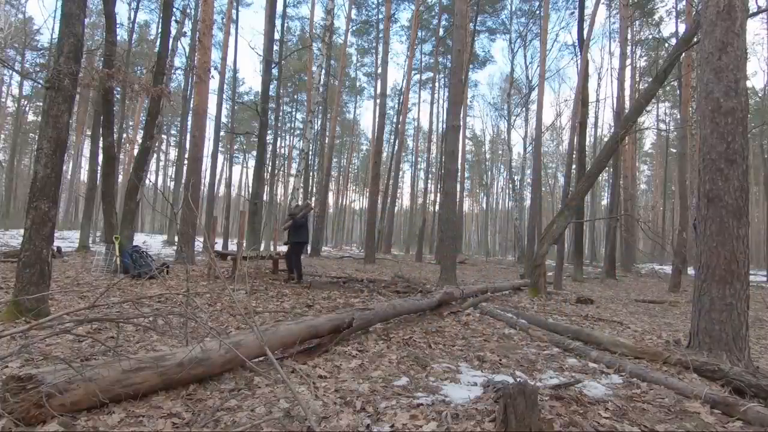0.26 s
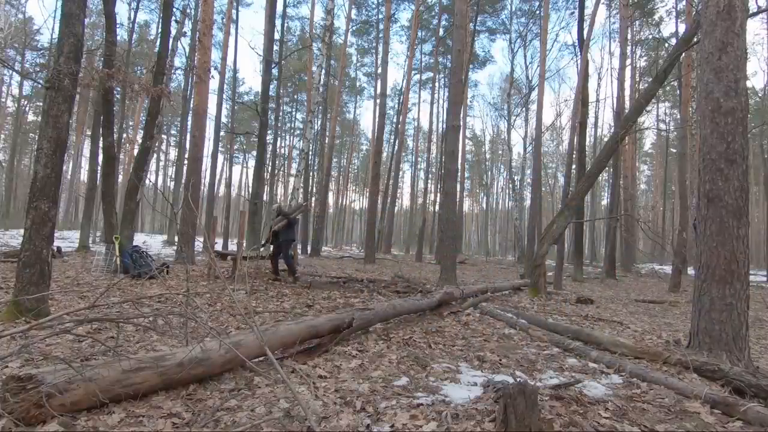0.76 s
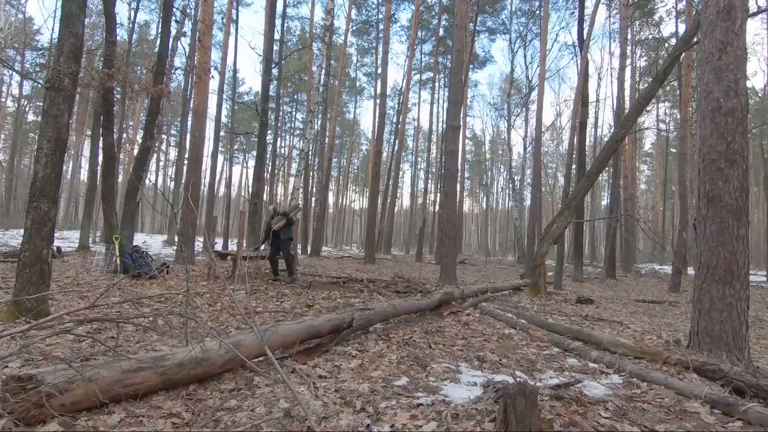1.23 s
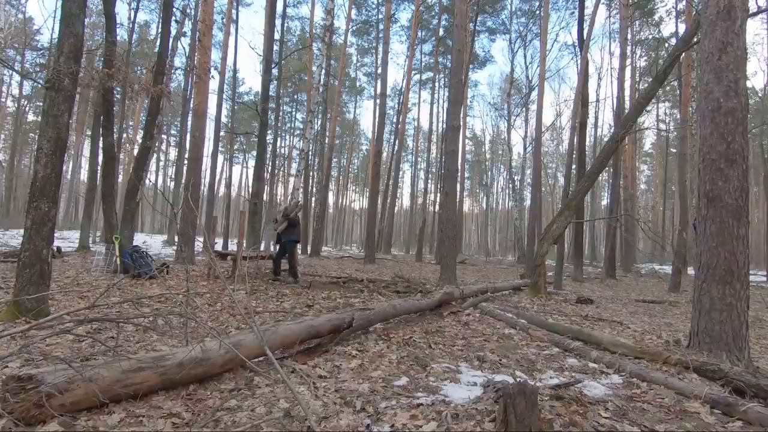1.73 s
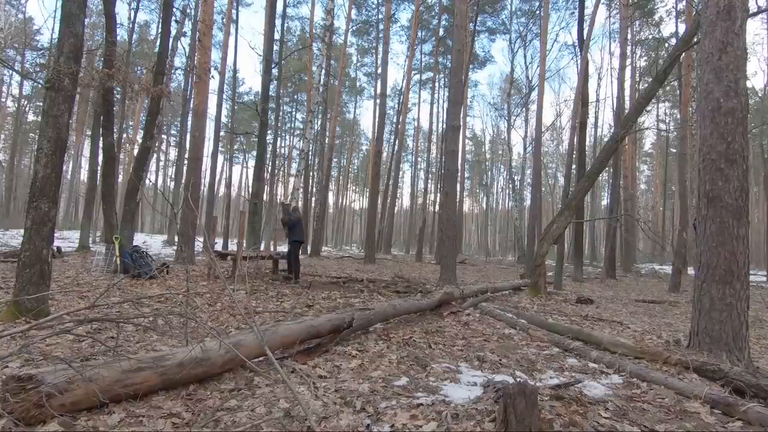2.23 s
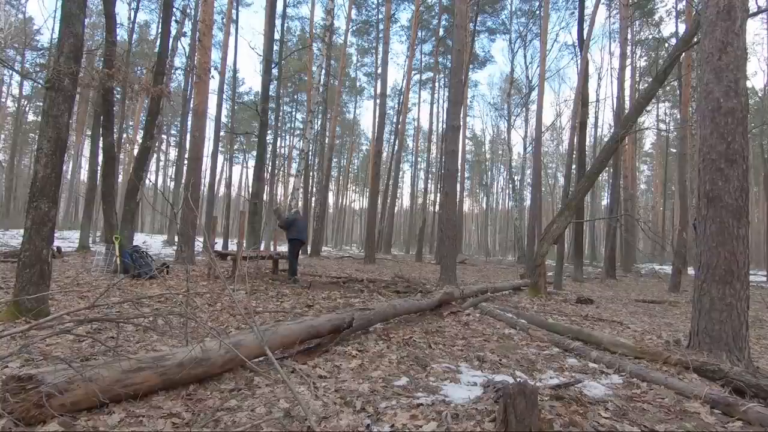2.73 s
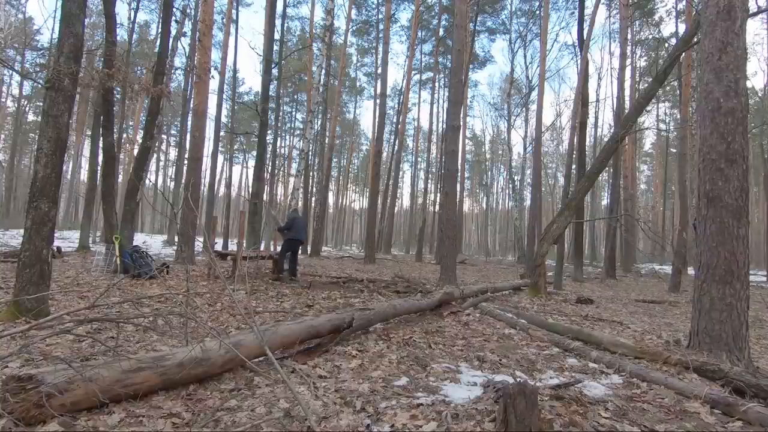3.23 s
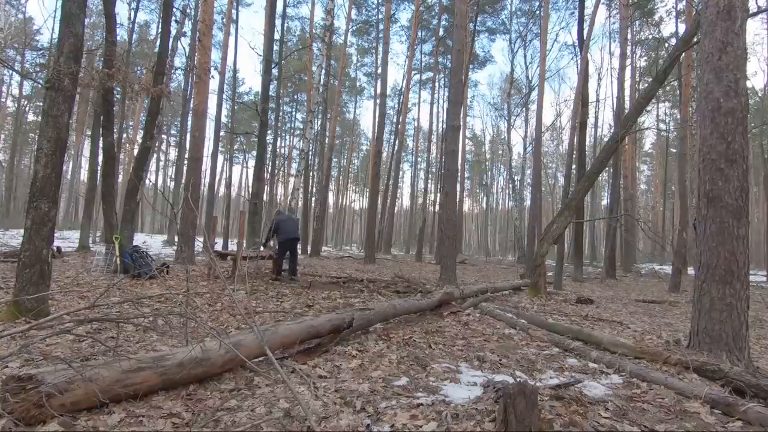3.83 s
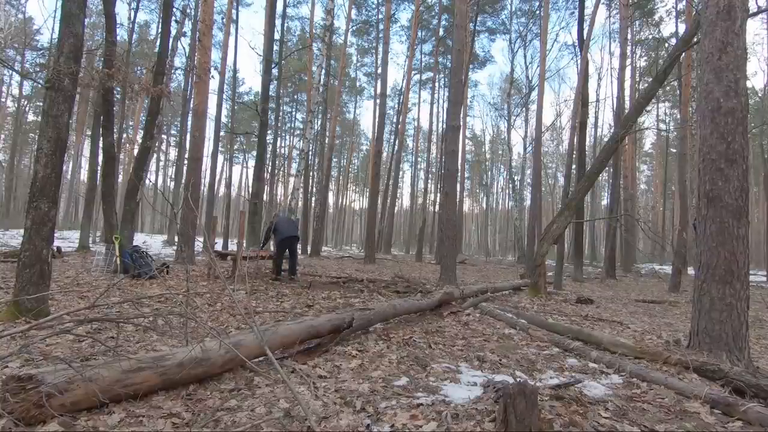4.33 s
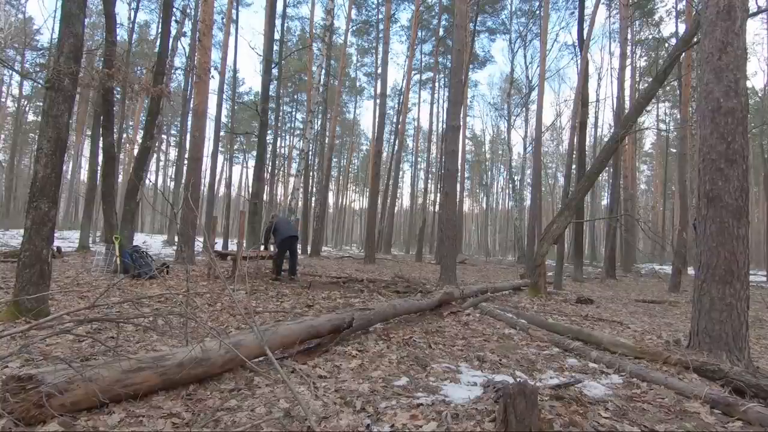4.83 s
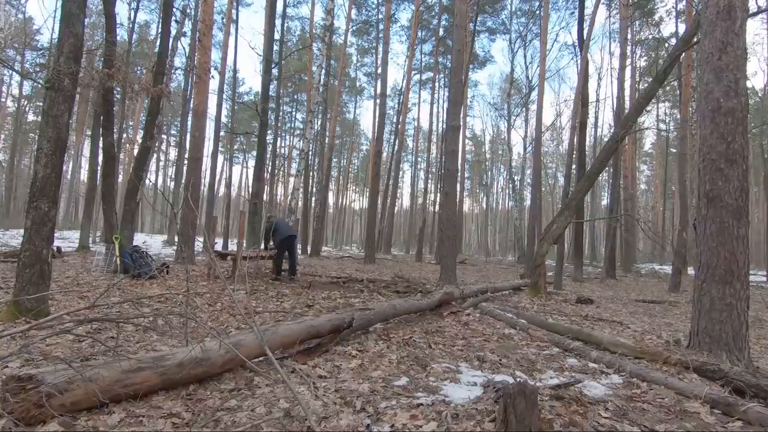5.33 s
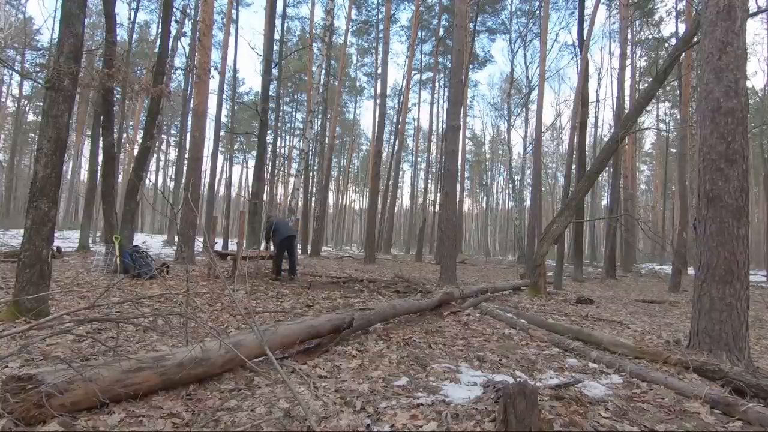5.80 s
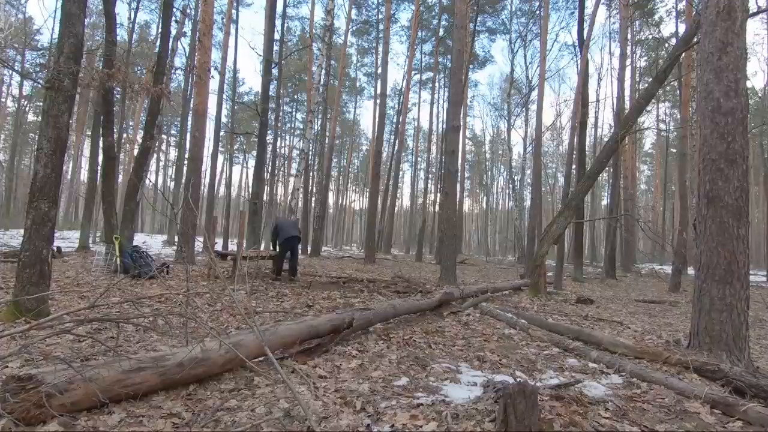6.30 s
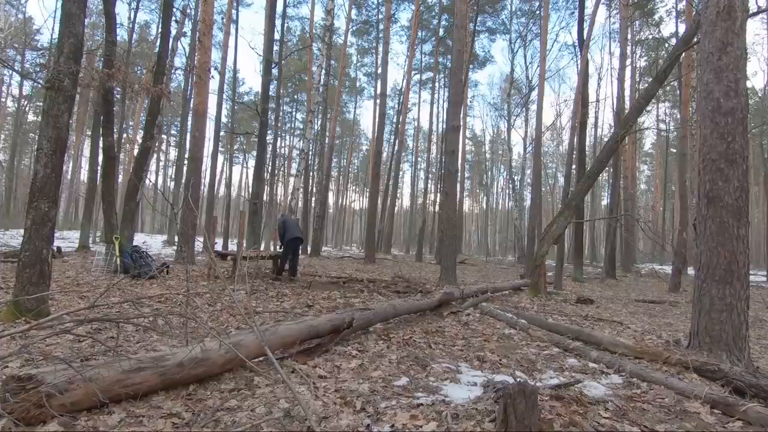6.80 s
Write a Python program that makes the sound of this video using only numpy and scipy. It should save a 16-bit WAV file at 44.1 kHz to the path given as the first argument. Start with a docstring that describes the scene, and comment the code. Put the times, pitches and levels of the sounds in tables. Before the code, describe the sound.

In a bare forest, faint air hiss, a far low engine hum and slow wind pressure come first. After about a second, dry branches are handled on a low bench: sharp twig snaps, a light metal rattle, scraping bark and dragged poles, then clusters of cracks, knocks and soft thuds. A hollow pole rings once late. The camera microphone catches it with a short scattered tail from the trees.

```python
"""Air hiss, a low hum and slow wind heaves are heard first; then dry branches are handled on a low bench.
Twigs snap, poles knock and thud: each is a click and dying noise sent through a resonance.
A hollow pole and a small metal part ring as fading sine tones; bark and a dragged pole scrape as gritty noise.
A bare forest adds a short scattered tail to this work, and the camera body colours it.
The hiss and wind pressure are shaped noise; the far engine's hum is one low tone near 43 Hz."""
import sys
import numpy as np
from scipy import signal
from scipy.fft import rfft, irfft, next_fast_len
from scipy.io import wavfile
from scipy.ndimage import map_coordinates

SR = 44100
rng = np.random.default_rng(int(sys.argv[2]) if len(sys.argv) > 2 else 0)


def to_wav(s):
    """Save 16-bit WAV."""
    ch = np.atleast_2d(s).T  # columns
    pcm = np.round(np.clip(ch, -1, 1) * 32767)  # PCM
    wavfile.write(sys.argv[1], SR, pcm.astype(np.int16))


N = 311346  # length in samples


def amp(db):
    """Turn decibels into a gain."""
    return 10 ** (np.asarray(db) / 20)


def unit(x):
    """Scale a sound to an average (rms) strength of 1."""
    return x / np.sqrt(np.mean(x ** 2) + 1e-20)


def along(points, hz):
    """Read a curve of (Hz, value) points, with frequency on a log axis."""
    point_hz, values = np.transpose(points)
    return np.interp(np.log(hz + 1e-3), np.log(point_hz), values)


def curves(rows):
    """Give one value per sample for each column after the time."""
    seconds, *columns = np.transpose(rows)
    return [np.interp(np.arange(N) / SR, seconds, column) for column in columns]


def wobble(rate):
    """Draw a smooth random curve with `rate` random points a second."""
    points = rng.standard_normal(int(N * rate / SR) + 4)
    return map_coordinates(points, [np.arange(N) * rate / SR])


def filtered(x, response):
    """Multiply the spectrum of x by a response that depends on frequency."""
    size = next_fast_len(N + SR // 2)
    spectrum = rfft(x, size) * response(np.fft.rfftfreq(size, 1 / SR))
    return irfft(spectrum, size)[..., :N]


def shaped_noise(points):
    """Noise of rms 1 whose spectrum follows (Hz, dB) points."""
    return unit(filtered(rng.standard_normal(N), lambda f: amp(along(points, f))))


def resonance(f, hz, width_hz):
    """A damped vibration passes a band of frequencies, with gain 1 at its centre."""
    return 1j * f * width_hz / (hz * hz - f * f + 1j * f * width_hz)


def bursts(events, tail_db, attack, order):
    """Each contact is a click and dying noise; a higher order repeats the resonance to narrow its band."""
    out, t = np.zeros(N + SR), np.arange(SR // 3) / SR
    size = 2 * len(t)
    f = np.fft.rfftfreq(size, 1 / SR)
    for s, db, hz, width_hz, t60 in events:
        fade = amp(tail_db - 60 * t / t60) * (1 - np.exp(-t / attack))
        push = fade * rng.standard_normal(len(t))
        push[0] += np.sqrt(SR / hz)  # the click
        sound = irfft(rfft(push, size) * resonance(f, hz, width_hz) ** order)[:len(t)]
        out[round(s * SR):][:len(t)] += amp(db) * sound / np.abs(sound).max()
    return out[:N]


def ringing(blows, modes, scatter_db, attack):
    """Each blow rings the same set of fading tones at new random strengths."""
    out, t = np.zeros(N + SR), np.arange(SR // 3) / SR
    for s, db in blows:
        ring = np.zeros(len(t))
        for hz, level, t60 in modes:
            start_db = level + scatter_db * rng.standard_normal()
            ring += amp(start_db - 60 * t / t60) * np.sin(2 * np.pi * hz * t)
        out[round(s * SR):][:len(t)] += amp(db) * ring * (1 - np.exp(-t / attack))
    return out[:N]


def grit(per_s, spread_db, slip_s, bed):
    """Friction makes short noisy slips of uneven size over a bed of noise, rms 1."""
    starts = (rng.random(N) < per_s / SR) * amp(spread_db * rng.standard_normal(N))
    fade = np.exp(-1 / (slip_s * SR))
    slips = unit(signal.lfilter([1], [1, -fade], starts))
    return unit((slips + bed) * rng.standard_normal(N))


def swells(rows):
    """Each stroke grows to its peak and dies away, straight in dB; powers add."""
    rise, ends_db = .45, 14  # share of the length before the peak; dB lost by either end
    t = np.arange(N) / SR
    power = np.zeros(N)
    for s, db, length in rows:
        distance = np.maximum((s - t) / rise, (t - s) / (1 - rise)) / length
        power += amp(db - ends_db * distance) ** 2
    return np.sqrt(power)


def twig_snaps():
    """Breaking twigs give wide, short cracks; fainter ones crumble longer."""
    # Each row: start in seconds, peak level in dB, centre pitch in Hz, resonance width in Hz.
    snaps = [(1.491, -31, 3960, 9000), (1.8233, -11, 6440, 13600), (2.1934, -39, 2800, 3000),
             (2.4379, -27, 3840, 9000), (2.6194, -35.5, 2700, 4000), (2.7945, -39, 7000, 5000),
             (2.9851, -28.5, 3240, 6000), (3.1627, -32, 2800, 3000), (3.6451, -31, 3500, 6000),
             (3.933, -38, 2100, 800), (3.9464, -23, 2600, 4500), (3.9639, -24, 2600, 5000),
             (4.0791, -25, 2500, 7000), (4.2098, -25.5, 4500, 14000), (4.2254, -29, 5500, 14000),
             (4.315, -36, 2164, 1500), (4.3555, -35.5, 2475, 3000), (4.4957, -30.5, 7860, 6000),
             (4.5735, -17, 3700, 7500), (4.6745, -21.5, 3200, 4500), (4.6788, -13.5, 3500, 7500),
             (5.686, -32, 3400, 5000), (5.7094, -23, 3470, 9000), (5.733, -19, 3000, 4950),
             (5.7365, -13.5, 3220, 4420), (5.7578, -22, 4070, 2500), (5.768, -36, 3005, 5000),
             (6.0357, -42, 3400, 2000), (6.2352, -33, 3870, 9200)]
    # A -25 dB snap falls by 60 dB in 0.017 s; each dB fainter adds 0.0008 s.
    events = [(s, db, hz, width, .017 - .0008 * (db + 25)) for s, db, hz, width in snaps]
    return bursts(events, tail_db=-3, attack=0.0003, order=2)


def wood_knocks():
    """Wood striking wood makes a softer-edged burst around a woody pitch."""
    # Each row: start in seconds, peak level in dB, pitch in Hz, resonance width in Hz,
    # time for the noise to fall 60 dB in seconds.
    knocks = [(1.227, -34, 1315, 1200, .03), (1.236, -33, 1050, 800, .04), (1.491, -38, 1600, 2000, .045),
              (1.824, -21.5, 680, 1500, .024), (3.128, -29, 1400, 900, .04), (3.217, -20.5, 450, 750, .022),
              (3.219, -34, 1800, 1600, .02), (3.24, -31, 560, 700, .089), (3.9464, -28, 1850, 900, .02),
              (4.415, -36.5, 740, 300, .044), (4.458, -35, 1560, 1500, .043),
              (4.474, -28.5, 500, 1200, .078), (4.504, -36, 598, 400, .053), (4.557, -35.5, 700, 400, .03),
              (4.575, -24, 1400, 1800, .055), (4.584, -26, 972, 248, .06), (4.582, -23, 450, 600, .075),
              (4.597, -33, 1600, 1500, .04), (4.632, -30, 350, 475, .046), (5.506, -26, 900, 1680, .05),
              (5.514, -21, 690, 1590, .048), (5.585, -40, 1250, 300, .033), (5.733, -27.5, 1510, 700, .05),
              (6.258, -33, 1310, 2000, .061), (6.264, -28, 280, 480, .083)]
    return bursts(knocks, tail_db=1.5, attack=0.0018, order=3)


def bench_thuds():
    """Pole ends landing on the bench make low, soft thuds; a short thud is a wide one."""
    # Each row: start in seconds, peak level in dB, pitch in Hz, time to fall 60 dB in seconds.
    thuds = [(1.825, -34, 188, .05), (3.217, -26, 125, 0.042), (4.473, -30.5, 185, .08),
             (4.572, -24.5, 142, 0.12), (4.604, -28, 112, 0.15), (4.971, -33.5, 148.6, .05),
             (5.339, -35, 159.6, 0.042), (5.511, -28, 141, 0.12), (5.644, -34.5, 156.6, 0.09),
             (6.265, -28, 135, 0.059), (6.28, -39, 98, 0.4)]
    damping = 8.5  # width in Hz times fall time in seconds
    events = [(s, db, hz, damping / t60, t60) for s, db, hz, t60 in thuds]
    return bursts(events, tail_db=-7, attack=0.0024, order=3)


def hollow_pole():
    """A struck hollow pole rings at a few fading pitches."""
    # Each row: start in seconds, blow strength in dB.
    blows = [(5.4635, -14), (5.355, -39)]
    # Each row: pitch in Hz, strength in dB before random scatter, time to fall 60 dB in seconds.
    modes = [(583.4, -0.5, 0.13), (1200, -8.5, 0.046), (223, -15.5, 0.05), (460, -14, 0.031),
             (1596, -13, 0.016)]
    return ringing(blows, modes, scatter_db=0.4, attack=0.00047)


def bark_scrapes():
    """Rough bark crackles in many tiny slips as it is rubbed."""
    # Each row: peak time in seconds, peak level in dB, length in seconds.
    rubs = [(1.25, -52.5, .25), (1.5, -50.5, .2), (1.8, -54, .3), (1.96, -47, .13), (2.2, -51, .35),
            (2.62, -52, .6), (3.02, -50.5, .2), (3.11, -44.5, .22), (3.17, -41, .12), (3.65, -55, .9),
            (4.05, -55, .5), (4.33, -52, .4), (4.51, -48, .22), (4.62, -54, .3), (4.85, -58, 1.5),
            (5.53, -49, .25), (5.65, -48, .2), (5.72, -41, .2), (5.82, -48, .25), (6.255, -42, .07),
            (6.75, -52.5, .5)]
    # Tone of the bark. Each row: frequency in Hz, relative level in dB per Hz.
    bark = [(200, -23), (500, 3.5), (1200, 0.5), (2500, -2), (4200, -7), (8000, -10.5), (15500, -18)]
    slips = grit(per_s=700, spread_db=4.5, slip_s=.0007, bed=1.2)
    rustle = unit(filtered(slips, lambda f: amp(along(bark, f))))
    return swells(rubs) * rustle


def dragged_pole():
    """A pole dragged along the bench in pulls filters its slips through its own resonances."""
    # Each row: peak time in seconds, peak level in dB, length in seconds.
    pulls = [(2.714, -45, .3), (3.13, -46, .4), (3.36, -54, .5), (3.678, -46, .4), (3.97, -53, .2),
             (4.1, -56, .15)]
    # Each row: pitch in Hz, resonance width in Hz, relative strength in dB.
    modes = [(1064, 95, 6), (1670, 230, -14), (2580, 120, -13)]

    def pole(f):
        """Add the pole's resonances with alternating signs."""
        return sum((-1) ** k * amp(db) * resonance(f, hz, w) for k, (hz, w, db) in enumerate(modes))

    slips = grit(per_s=300, spread_db=1.0, slip_s=.003, bed=1.3)
    return swells(pulls) * unit(filtered(slips, pole))


def metal_rattle():
    """A small metal part rings at several fading pitches, unevenly from hit to hit."""
    # Each row: start in seconds, hit strength in dB.
    hits = [(1.492, -49), (1.505, -52), (1.524, -45), (1.548, -52), (1.64, -52), (1.765, -50),
            (1.835, -45.5), (1.848, -48), (1.865, -53)]
    # Each row: pitch in Hz, strength in dB before random scatter, time to fall 60 dB in seconds.
    modes = [(1184, 1, 0.15), (2165, -4.5, 0.13), (2210, -4, 0.18), (3970, -7, 0.079), (6030, 1, 0.052),
             (6030, -6, 0.052), (7770, -5, .04)]
    return ringing(hits, modes, scatter_db=4, attack=0.0016)


def forest(x):
    """Trunks scatter a short tail, each frequency dying at its own speed."""
    # Each row: frequency in Hz, time to fall 60 dB in seconds.
    decay = [(200, 0.16), (2000, 0.18), (10000, .1)]
    hz, t, noise = signal.stft(rng.standard_normal(SR // 2), SR, nperseg=256)
    fading = noise * amp(-60 * t / along(decay, hz)[:, None])
    tail = signal.istft(fading, SR, nperseg=256)[1]
    delayed = np.pad(x, (300, 0))  # 300 samples, about 7 ms
    return signal.fftconvolve(delayed, tail / np.linalg.norm(tail))[:N]


def camera_body(x):
    """The camera body lifts some bands and partly cancels others."""
    # Each row: centre in Hz, width in Hz, share added (negative shares cancel).
    body = [(4460, 1140, 0.85), (5190, 1780, -0.88), (12700, 11300, -0.47)]
    return filtered(x, lambda f: np.prod([1 + share * resonance(f, hz, w) for hz, w, share in body], axis=0))


def wind_heave():
    """Slow wind pressure pushes on the microphone as very low noise that swells and sinks."""
    # Each row: time in seconds, level in dB.
    heave = [(0, -21.5), (1, -28), (1.7, -20.5), (2.3, -24), (3, -28), (4, -26), (4.5, -22.5), (5.2, -21.5),
             (5.8, -19), (6.4, -22), (6.85, -14), (7.06, -10)]
    # Each row: frequency in Hz, relative level in dB per Hz.
    gusts = [(.5, -7), (1.5, 1.5), (3, 0), (5, -7.5), (10, -31), (20, -35), (30, -38.5), (48, -49),
             (70, -120)]
    level_db, = curves(heave)
    return amp(level_db) * shaped_noise(gusts)


def engine_hum():
    """A far engine hums as one low tone near 43 Hz, its level wavering."""
    # Each row: time in seconds, pitch in Hz, level in dB before the wavering.
    hum = [(0.3, 42.5, -46), (2.5, 42.5, -47), (2.7, 43.6, -46), (4.0, 43.6, -43), (5.8, 43.6, -44),
           (6.0, 45.1, -46), (6.95, 45.1, -49)]
    hz, db = curves(hum)
    level = np.sqrt(2) * amp(db + 2.5 * wobble(7))  # a sine's peak is root 2 times its rms
    return level * np.sin(2 * np.pi * np.cumsum(hz) / SR)


def air_hiss():
    """Air and recorder hiss together are shaped noise whose level wavers slightly."""
    # Each row: frequency in Hz, relative level in dB per Hz.
    air = [(29, -44), (50, -3.5), (61, -6.5), (70, -10.5), (103, -14), (175, -18.5), (252, -19), (291, -19),
           (362, -17), (729, -20), (1780, -30), (6240, -35), (16000, -39)]
    return amp(-46.5 + 0.47 * wobble(3.15)) * shaped_noise(air)


def scene():
    """Join the near work, its scatter off the trees and the background."""
    branches = twig_snaps() + wood_knocks() + bench_thuds() + hollow_pole()
    work = branches + bark_scrapes() + dragged_pole() + metal_rattle()
    near = camera_body(work + amp(-10.5) * forest(work))
    background = wind_heave() + engine_hum() + air_hiss()
    return (near + background)[None]  # one channel


def record(dry):
    """The camera keeps nothing at or above its band limit."""
    top_hz = 15800
    return filtered(dry, lambda hz: hz < top_hz)


dry = scene()
out = record(dry)
to_wav(out)
```